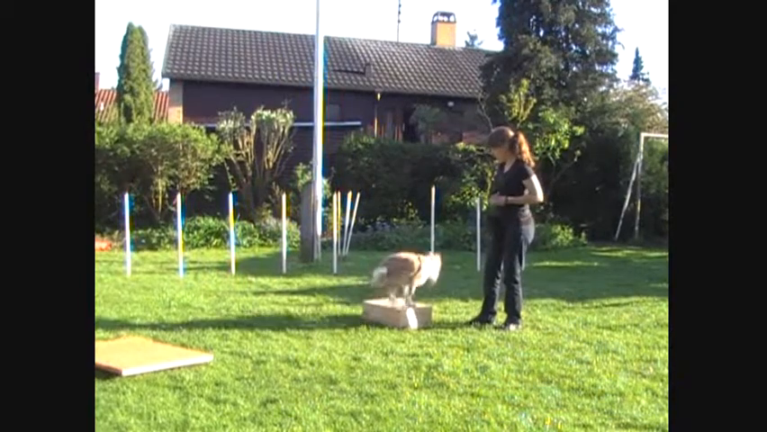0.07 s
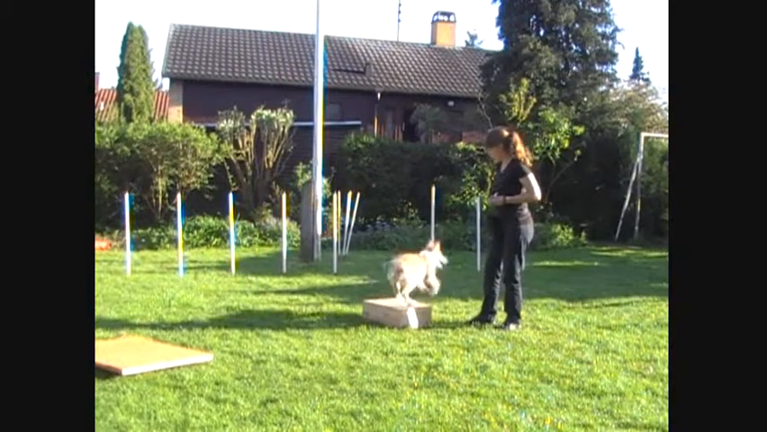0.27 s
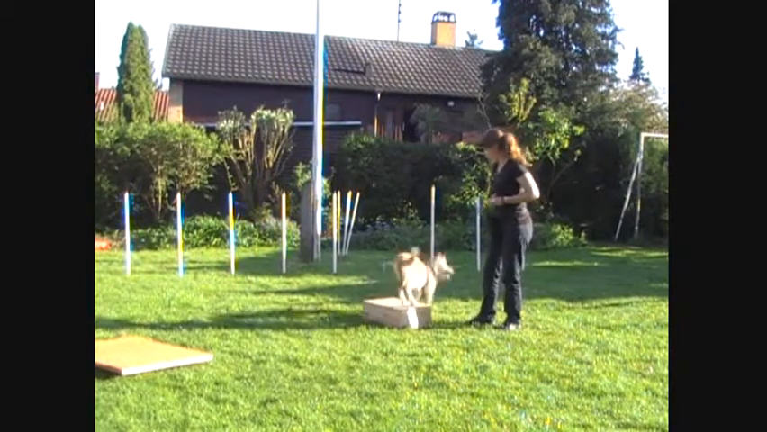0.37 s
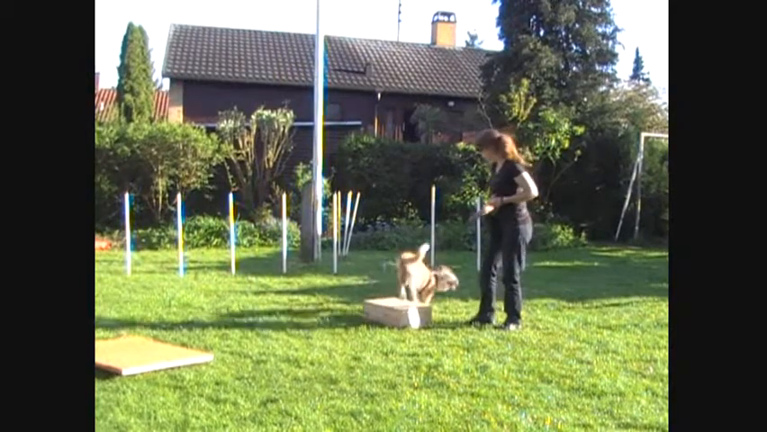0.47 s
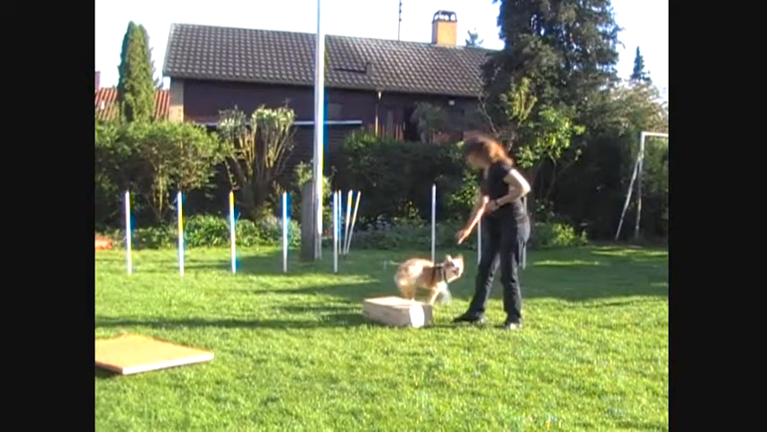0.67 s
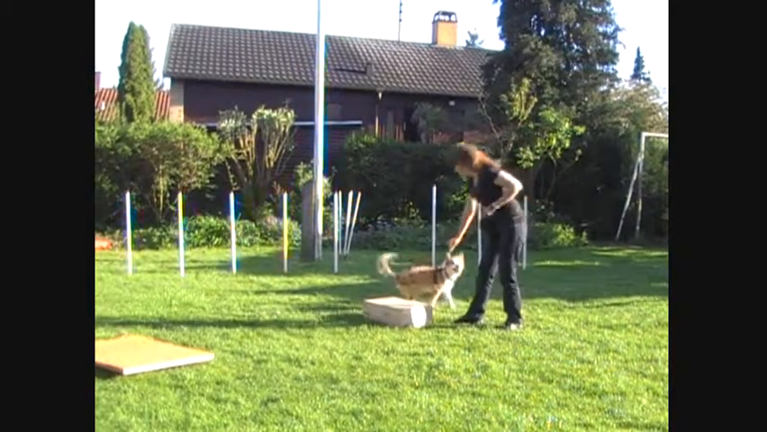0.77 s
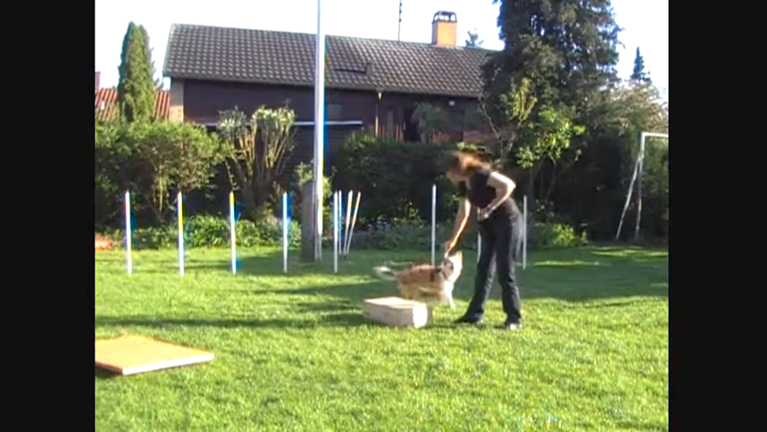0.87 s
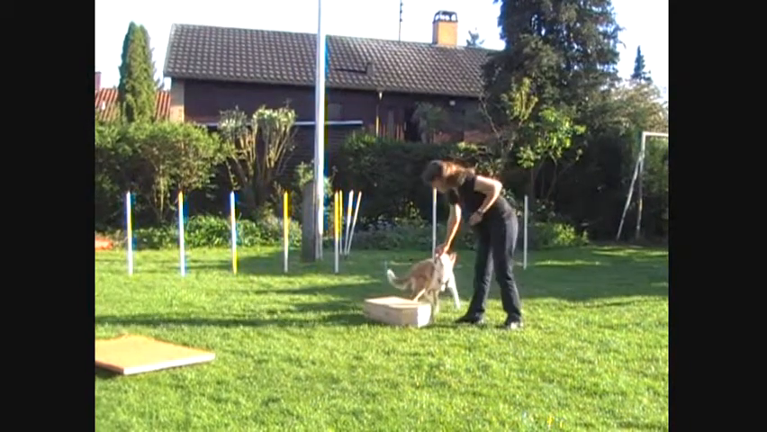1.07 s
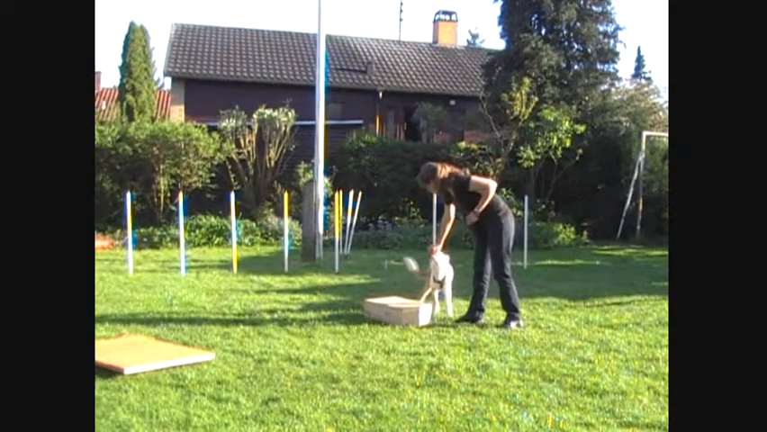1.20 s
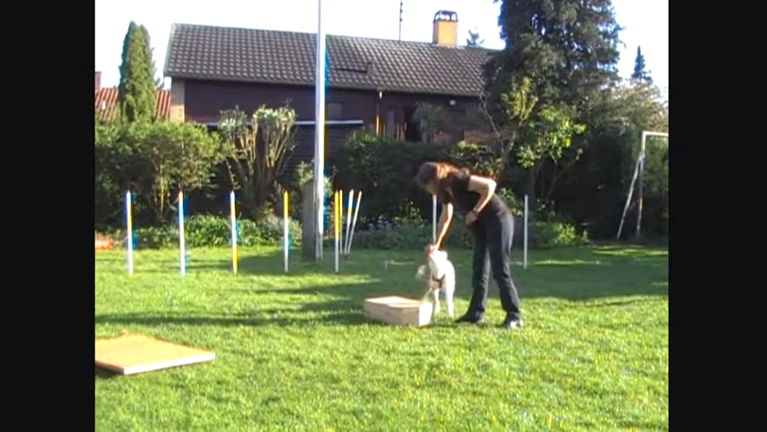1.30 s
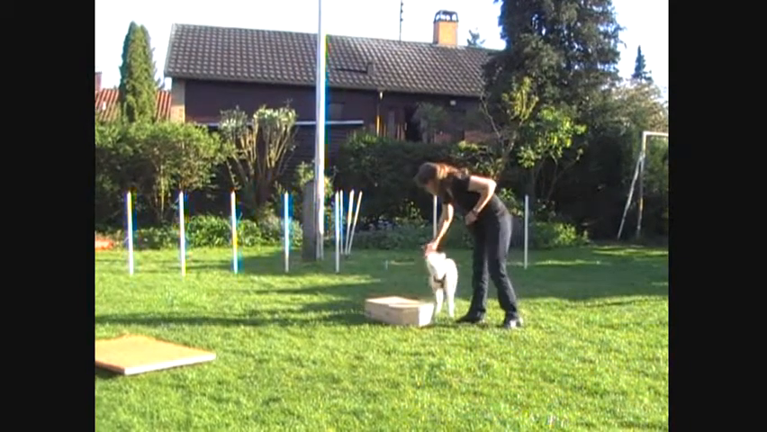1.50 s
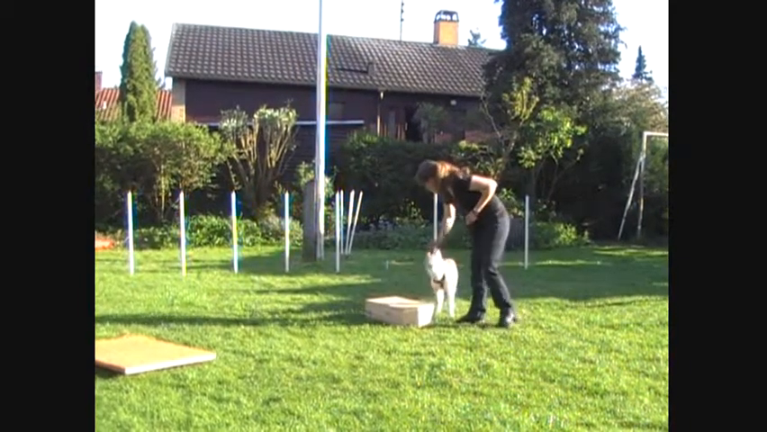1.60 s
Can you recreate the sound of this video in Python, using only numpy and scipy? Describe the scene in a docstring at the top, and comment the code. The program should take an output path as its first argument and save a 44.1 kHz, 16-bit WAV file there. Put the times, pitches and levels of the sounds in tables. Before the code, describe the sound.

A handheld training clicker snaps twice in quick succession close to the microphone, with a short garden echo. A dog's paws knock faintly on a wooden box and brush the grass, while sparrows chirp over a distant traffic hum.

```python
"""A garden with hedges and a house wall, heard through a stereo camera microphone.
Close by, a handheld training clicker is pressed and let go: its steel tongue snaps twice in a plastic
case, the hedges scatter the clicks and the wall returns them. A dog hops off a hollow wooden box into
the grass. Sparrows chirp in the bushes, far traffic hums, and a faint breeze rumbles on the microphone."""
import sys
import numpy as np
from scipy import signal
from scipy.fft import rfft, irfft, next_fast_len
from scipy.io import wavfile
from scipy.ndimage import map_coordinates

SR = 44100
rng = np.random.default_rng(int(sys.argv[2]) if len(sys.argv) > 2 else 0)


def wav_record(signal):
    """Record a signal, one row per channel, as 16-bit PCM in the file named by sys.argv[1]."""
    frames = np.transpose(np.atleast_2d(signal))
    bounded = np.clip(frames, -1, 1)
    # unit amplitude maps onto the largest positive 16-bit level
    quanta = np.round(bounded * 32767).astype(np.int16)
    wavfile.write(sys.argv[1], SR, quanta)


N = 72765


def amp(db):
    """Decibels to gain."""
    return 10 ** (np.asarray(db) / 20)


def unit(x):
    """Scale to rms 1."""
    return x / np.sqrt(np.mean(x ** 2) + 1e-20)


def along(points, hz):
    """Read (frequency_hz, value) points on a log frequency axis."""
    freqs, values = np.transpose(points)
    return np.interp(np.log(hz + 1), np.log(freqs + 1), values)


def since(start_s):
    """Seconds since start_s, zero before it."""
    return np.maximum(np.arange(N) / SR - start_s, 0)


def gate(start_s, end_s, edge_s):
    """One between two times, with soft edges."""
    t = since(0)
    inside_s = np.minimum(t - start_s, end_s - t)
    return np.sin(np.pi / 2 * np.clip(inside_s / edge_s + .5, 0, 1)) ** 2


def swell(t, peak_s, shape):
    """A brief rise to 1 and a fall."""
    return (t / peak_s * np.exp(1 - t / peak_s)) ** shape


def wobble(rate):
    """A smooth random curve, rate knots a second."""
    return map_coordinates(rng.standard_normal(N // 8), [np.arange(N) * rate / SR], mode="mirror")


def ring(t, modes):
    """A struck body: dying sines from (pitch_hz, level_db, t60_s) rows."""
    return sum(amp(db - 60 * t / t60) * np.sin(2 * np.pi * hz * t) for hz, db, t60 in modes)


def filtered(x, response):
    """Multiply the spectrum of x by response(hz)."""
    size = next_fast_len(N + SR // 2)
    return irfft(rfft(x, size) * response(np.fft.rfftfreq(size, 1 / SR)), size)[..., :N]


def high_pass(x, hz, order=2):
    """Small objects radiate little bass."""
    return signal.sosfilt(signal.butter(order, hz, "high", fs=SR, output="sos"), x)


def noise(spectrum):
    """Coloured noise of rms 1."""
    return unit(filtered(rng.standard_normal(N), lambda hz: amp(along(spectrum, hz))))


def pan(left_db):
    """Gains that raise the left channel and lower the right."""
    return amp([[left_db], [-left_db]])


def scatter(x, t60s, spread=0.38):
    """Diffuse stereo reflections, dying as the (frequency_hz, t60_s) rows say."""
    hz, t, bands = signal.stft(rng.standard_normal((2, SR * 3 // 4)), SR, nperseg=128)
    decay = amp(-60 * t / along(t60s, hz)[:, None])
    mid, side = signal.istft(bands * decay, SR, nperseg=128)[1]
    tail = np.array([mid + spread * side, mid - spread * side])
    return signal.fftconvolve(x[None], tail / np.linalg.norm(tail[0]), axes=1)[:, :N]


# How alike left and right are at the microphone: frequency_hz, correlation
STEREO_LIKENESS = [(30, -0.99), (70, 0.066), (130, -0.13), (250, -0.23), (500, 0.2), (1000, 0.76),
                   (3000, 0.71), (10000, .5)]

def wide_noise(spectrum):
    """Coloured stereo noise of rms 1, reaching the microphone from all around."""
    def mid_side_gains(hz):
        angle = np.arccos(np.clip(along(STEREO_LIKENESS, hz), -1, 1)) / 2
        return amp(along(spectrum, hz)) * [np.cos(angle), np.sin(angle)]
    mid, side = filtered(rng.standard_normal((2, N)), mid_side_gains)
    return unit(np.array([mid + side, mid - side]))


# Wind right on the microphone: frequency_hz, relative_db
WIND_SPECTRUM = [(15, -9), (35, -20), (80, -7), (130, -16), (300, -7), (1000, -28)]

def breeze(level_db=-71.5, gust_db=1.8):
    """A faint rumble that pushes the two microphone ports against each other."""
    rumble = amp(level_db + gust_db * wobble(8.3)) * noise(WIND_SPECTRUM)
    return rumble * np.array([[1], [-1]])


# Roads far beyond the garden: frequency_hz, relative_db
TRAFFIC_SPECTRUM = [(20, -52), (50, -19), (100, -14.5), (200, -10), (330, -11.5), (500, -7.5), (780, -4),
                    (1150, -3.5), (1550, -8), (2300, -14.5), (3500, -26.5), (6000, -21), (8000, -25.5),
                    (11000, -36), (16000, -50)]

def traffic(level_db=-51.5, sway_db=0.94):
    """Far traffic blends into a nearly steady hum."""
    return amp(level_db - sway_db * wobble(8.4)) * wide_noise(TRAFFIC_SPECTRUM) * pan(left_db=1)


# Rise and fall of the sparrows farther off: time_s, level_db
CHATTER_LEVELS = [(0, -62), (.1, -70.5), (.18, -48.5), (.58, -55), (.7, -60), (.98, -75), (1.04, -46),
                  (1.08, -55.5), (1.19, -63), (1.29, -66), (1.34, -50), (1.4, -47), (1.5, -56.5),
                  (1.58, -60), (1.65, -51)]
# Their colour at the microphone: frequency_hz, relative_db
CHATTER_SPECTRUM = [(1500, -56), (3000, 3), (4300, 3.5), (5500, -1.5), (6800, -4.5), (8500, -14),
                    (14000, -54.5)]

def distant_chatter():
    """Distant sparrows blur into a band of high noise that comes and goes."""
    level_db = np.interp(since(0), *np.transpose(CHATTER_LEVELS))
    return amp(level_db) * wide_noise(CHATTER_SPECTRUM)


# Nearer sparrows, a syllable a row: warble_share of the pitch, reverb_db, [(time_s, pitch_hz, level_db)]
SPARROW_SYLLABLES = [ (0.042, 2.5, [(0, 4726, -55), (.04, 4620, -60)]), (0.017, -5, [(.288, 3400, -42),
                     (.297, 3046, -41.5), (.31, 3350, -52)]), (0.0057, -8, [(.404, 3670, -38),
                     (.413, 4327, -52), (.418, 4670, -34), (.433, 4720, -39.5), (.44, 3810, -39),
                     (.454, 3870, -37.5), (.464, 3285, -37.5)]), (0.013, -7.5, [(.471, 3210, -40.5),
                     (.483, 3305, -30), (.491, 3540, -35), (.495, 4264, -40), (.501, 3317, -31),
                     (.509, 3504, -40), (.518, 2910, -41.5)]), (0.014, -8, [(1.029, 3220, -64),
                     (1.034, 4920, -57), (1.038, 6400, -55)]), (0.0147, -9, [(1.036, 2890, -55),
                     (1.041, 3710, -31.5), (1.048, 3616, -39), (1.052, 4070, -36), (1.064, 3260, -32.5),
                     (1.069, 3710, -34), (1.076, 2600, -48)]), (0.0067, -12, [(1.063, 3940, -40.5),
                     (1.069, 4140, -39), (1.077, 3960, -56)]), (0.0295, -2, [(1.08, 2480, -43.5),
                     (1.091, 2957, -35.5), (1.101, 2883, -41.5), (1.111, 2460, -39)]),
                     (0.033, -5.5, [(1.358, 3946, -42), (1.37, 4150, -38.5), (1.392, 4450, -44),
                     (1.401, 3850, -35.5), (1.423, 4750, -45), (1.43, 3690, -34), (1.444, 3160, -42)]),
                     (0.036, 2, [(1.385, 3620, -41.5), (1.41, 3300, -41), (1.428, 3530, -50)]),
                     (0.016, 2.5, [(1.35, 6800, -58), (1.372, 6810, -53), (1.42, 6950, -68)]),
                     (0.011, -4.5, [(1.454, 3200, -35.5), (1.465, 3426, -36), (1.475, 4050, -50),
                     (1.483, 3350, -39), (1.502, 2960, -51.5)]), (0.0436, 1, [(.53, 5200, -57),
                     (.553, 5900, -55), (.572, 5250, -53)]), (.03, 5, [(1.14, 5950, -69),
                     (1.155, 6300, -58), (1.185, 6100, -67)]), (0.037, 1, [(1.15, 3500, -56),
                     (1.185, 3376, -53.5), (1.235, 2764, -56.5)]), (0.0147, 0, [(1.25, 6370, -64),
                     (1.272, 5580, -59), (1.285, 6000, -64)]), (0.033, -0.5, [(1.602, 5600, -55.5),
                     (1.63, 5790, -46.5), (1.646, 6870, -48.5)]), (.015, -6, [(1.638, 3200, -52),
                     (1.65, 3650, -40.5)])]

def sparrows(warble_rate=600, flutter_db=2.5, octave_db=-33, bush_t60_s=0.2):
    """Warbling whistles with a weak octave, smeared by the bushes."""
    t, song, into_bushes = since(0), np.zeros(N), np.zeros(N)
    for warble_share, reverb_db, contour in SPARROW_SYLLABLES:
        times, hz, db = np.transpose(contour)
        pitch_hz = np.interp(t, times, hz) * (1 + warble_share * wobble(warble_rate))
        phase = 2 * np.pi * np.cumsum(pitch_hz) / SR
        level = amp(np.interp(t, times, db) + flutter_db * wobble(warble_rate))
        level *= gate(times[0], times[-1], edge_s=0.00075)
        note = level * (np.sin(phase) + amp(octave_db) * np.sin(2 * phase))
        song += note
        into_bushes += amp(reverb_db) * note
    return song + scatter(into_bushes, [(1000, bush_t60_s)])


# Soft footfalls on the lawn: start_s, pitch_hz, level_db
FOOTFALLS = [(.155, 155, -56.5), (0.431, 85, -60.5), (0.789, 89.5, -67), (0.978, 126, -56)]
# The dog moving through the grass: start_s, length_s, level_db
GRASS_SWISHES = [(0.048, 0.011, -51), (0.162, 0.18, -56), (0.421, 0.031, -49.5), (.605, 0.069, -47.5),
                 (0.833, 0.056, -57)]
# Colour of the brushed blades: frequency_hz, relative_db
GRASS_SPECTRUM = [(600, -36), (1400, -3), (1850, 7.5), (2400, -2.5), (4000, -5), (6000, -13), (8200, -9),
                  (11000, -30.5), (15000, -40)]

def dog_in_grass(thud_peak_s=.007, rustle_db=2.4):
    """Paws thud softly on the lawn and brush the grass."""
    thuds = np.zeros(N)
    for start_s, hz, db in FOOTFALLS:
        t = since(start_s)
        thuds += amp(db) * swell(t, thud_peak_s, shape=2.4) * np.sin(2 * np.pi * hz * t)
    brushing = sum(amp(db) * gate(start_s, start_s + length_s, edge_s=0.015)
                   for start_s, length_s, db in GRASS_SWISHES)
    return thuds + brushing * amp(rustle_db * wobble(130)) * wide_noise(GRASS_SPECTRUM)


# Paws striking the wooden box: start_s, strength_db
PAW_STRIKES = [(0.283, -48.5), (0.296, -44.5), (0.306, -67), (0.317, -49)]
# Modes of the hollow box: pitch_hz, relative_db, t60_s
BOX_MODES = [(125, -6, 0.09), (196, -5, 0.08), (270, 1.5, 0.093), (485, -1.5, 0.046), (694, -8, 0.035)]

def dog_on_box():
    """Each paw drums the hollow box as the dog hops off."""
    knocks = sum(amp(db) * ring(since(start_s), BOX_MODES) for start_s, db in PAW_STRIKES)
    return high_pass(knocks, hz=110)


# Echoes off the house wall, some ten metres away: delay_s, relative_db
WALL_ECHOES = [(0.0575, -22), (0.0641, -25)]
# Colour of those echoes: frequency_hz, gain_db
WALL_RESPONSE = [(1000, -17), (2000, 24), (2800, -9), (4500, 0), (7000, -14), (12000, -12)]

def house_wall(snap):
    """The wall returns a snap as two coloured echoes, close together."""
    def response(hz):
        echoes = sum(amp(db) * np.exp(-2j * np.pi * hz * delay_s) for delay_s, db in WALL_ECHOES)
        return amp(along(WALL_RESPONSE, hz)) * echoes
    return filtered(snap, response)


# What the hedges send back to the microphone: frequency_hz, gain_db
HEDGE_RESPONSE = [(2000, 8), (2900, -6), (3700, 10.5), (5000, -5), (6500, -3), (9000, 3.5), (12000, -6)]
# How long the garden holds a click: frequency_hz, t60_s
GARDEN_DECAY = [(300, 0.19), (2500, 1), (6500, 0.43), (12000, 0.48)]

def hedges(snap, near_db=-9, near_t60_s=0.029, far_db=-17):
    """Nearby things scatter a snap briefly; the hedges farther out add a longer tail."""
    spill = filtered(snap, lambda hz: amp(along(HEDGE_RESPONSE, hz)))
    near = amp(near_db) * scatter(spill, [(1000, near_t60_s)])
    far = amp(far_db) * scatter(spill, GARDEN_DECAY)
    return near + far


# Modes of the clicker's steel tongue: pitch_hz
TONGUE_PITCHES = [1840, 2660, 3080, 3765, 4190, 4645, 5075, 5660, 5880, 6455, 7100, 7780, 8840, 9280, 11550,
                  14100]
# The same modes, row for row: pressed_db, released_db, t60_s
TONGUE_MODES = [(-15.5, -14, 0.012), (-23, -20, 0.017), (-25, -10, 0.013), (-28, -14, 0.024),
                (-4.5, -19, 0.029), (-6, -3, 0.022), (-3, -37, 0.012), (1.5, -17, 0.0098), (-8, -3, 0.02),
                (2.5, 7, .013), (0, -25, 0.012), (-9.5, -15, 0.021), (-18, -14, 0.017), (-5, -38, 0.0094),
                (-15, -15, 0.0054), (-29, -33, 0.0067)]

def steel_tongue(t, released, attack_s=.00015):
    """The tongue rings at the same pitches on press and release, in a different balance."""
    modes = [(hz, released_db if released else pressed_db, t60_s)
             for hz, (pressed_db, released_db, t60_s) in zip(TONGUE_PITCHES, TONGUE_MODES)]
    return ring(t, modes) * (1 - np.exp(-t / attack_s))


# Press and release, close to the microphone: start_s, steel_db, case_db, crack_db, released (0 or 1)
CLICKER_SNAPS = [(0.2042, -10, -5.5, -22, 0), (0.3281, -13.5, -11, -20.5, 1)]
# The broadband burst as the tongue buckles: frequency_hz, relative_db
CRACK_SPECTRUM = [(300, -55), (1200, -38), (1700, -27), (2500, -1), (7000, 13), (9500, -15), (12000, -21),
                  (15000, -28)]

def clicker(case_hz=2924, case_peak_s=0.00093, crack_t60_s=0.014):
    """The tongue buckles with a crack, rings and pops the hollow case; wall and hedges answer."""
    clicks = np.zeros((2, N))
    for start_s, steel_db, case_db, crack_db, released in CLICKER_SNAPS:
        t = since(start_s)
        steel = amp(steel_db) * steel_tongue(t, released)
        case = amp(case_db) * swell(t, case_peak_s, shape=2.24) * np.sin(2 * np.pi * case_hz * t)
        crack = amp(crack_db - 60 * t / crack_t60_s) * (t > 0) * noise(CRACK_SPECTRUM)
        snap = high_pass(steel + case + crack, hz=1590, order=4)
        clicks += snap + house_wall(snap) + hedges(snap)
    return clicks * pan(left_db=0.4)


def scene():
    """Everything that reaches the microphone in the garden."""
    return clicker() + sparrows() + distant_chatter() + dog_on_box() + dog_in_grass() + traffic() + breeze()


def record(dry):
    """The camera clips at full scale and keeps nothing above its band limit."""
    return filtered(np.clip(dry, -1, 1), lambda hz: hz < 16100)


dry = scene()
out = record(dry)
wav_record(out)
```